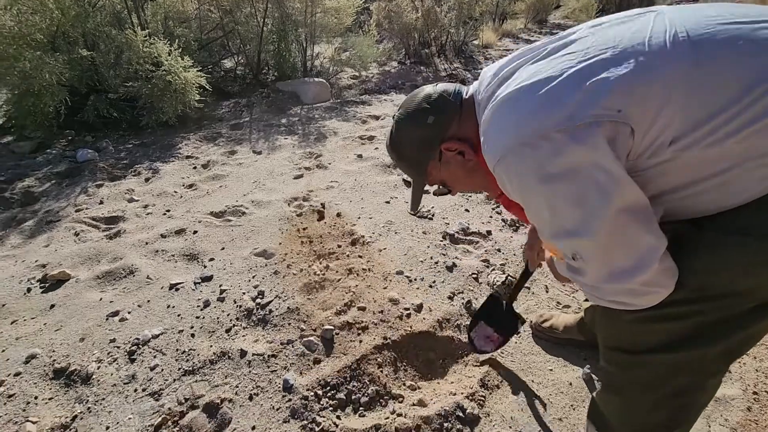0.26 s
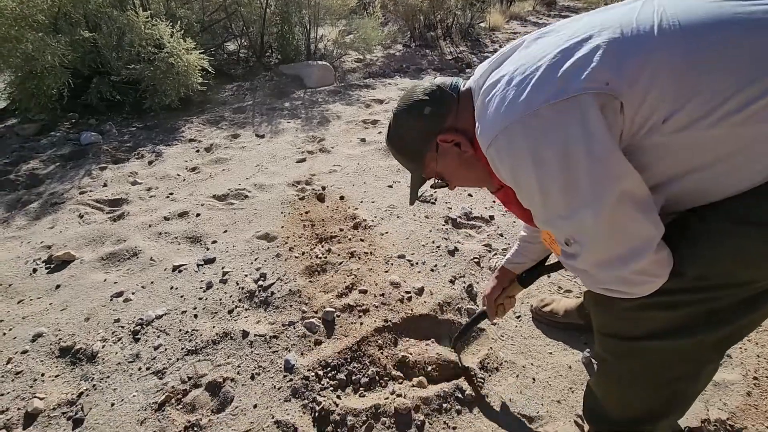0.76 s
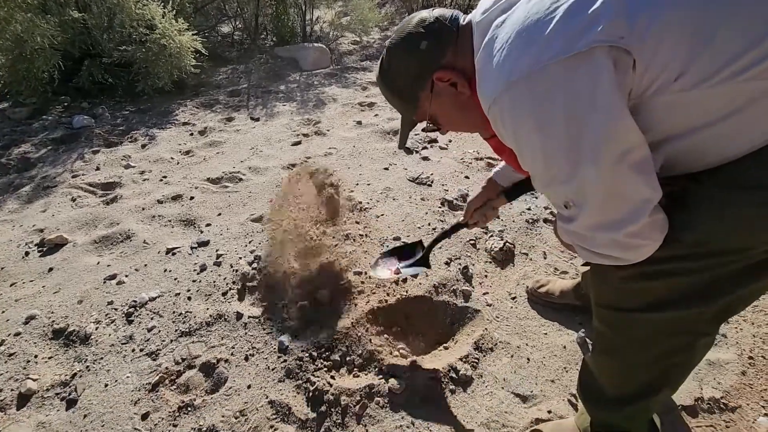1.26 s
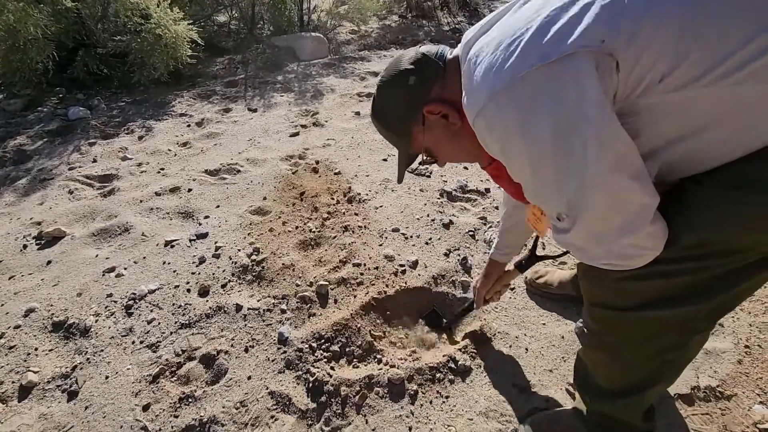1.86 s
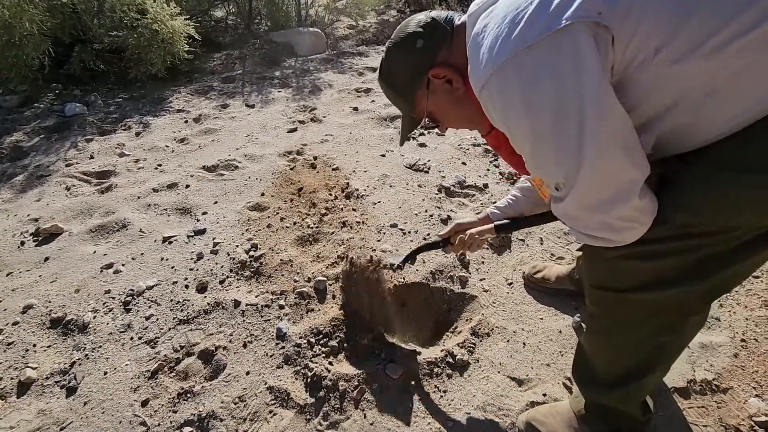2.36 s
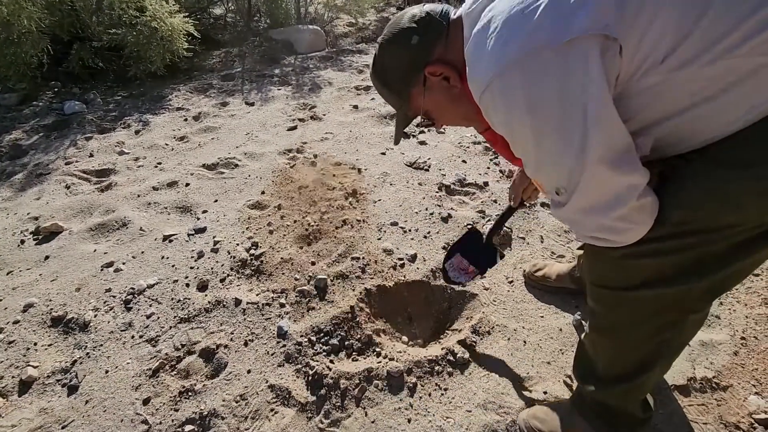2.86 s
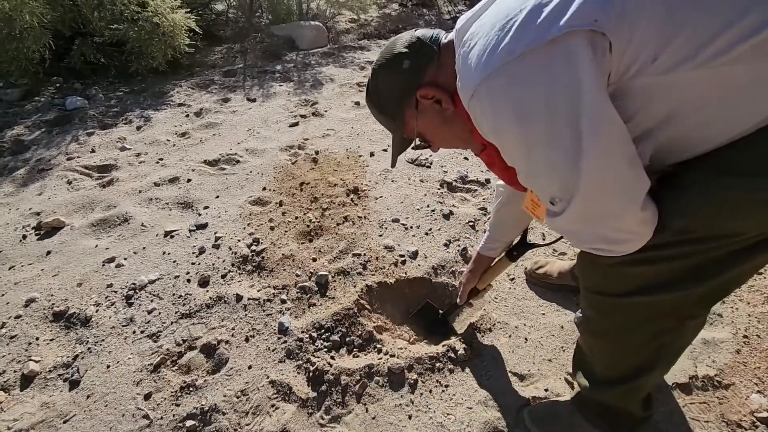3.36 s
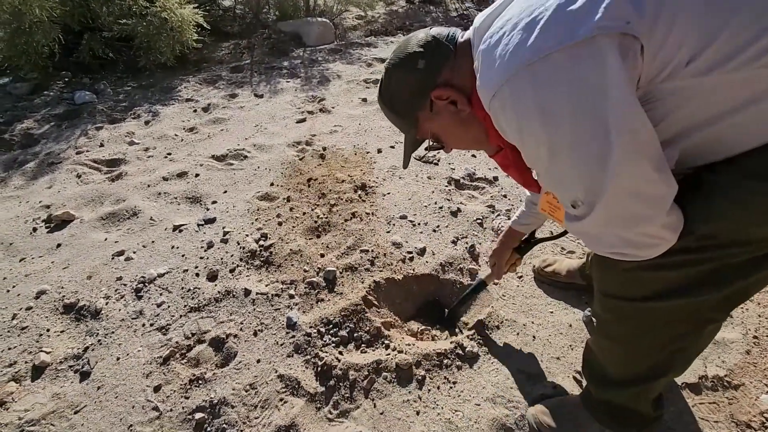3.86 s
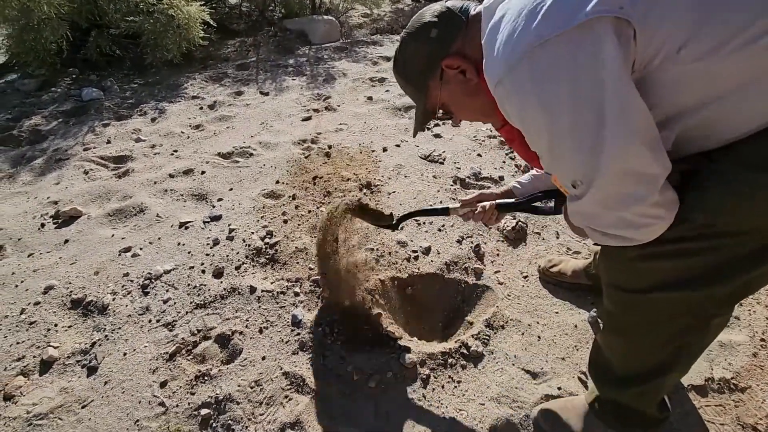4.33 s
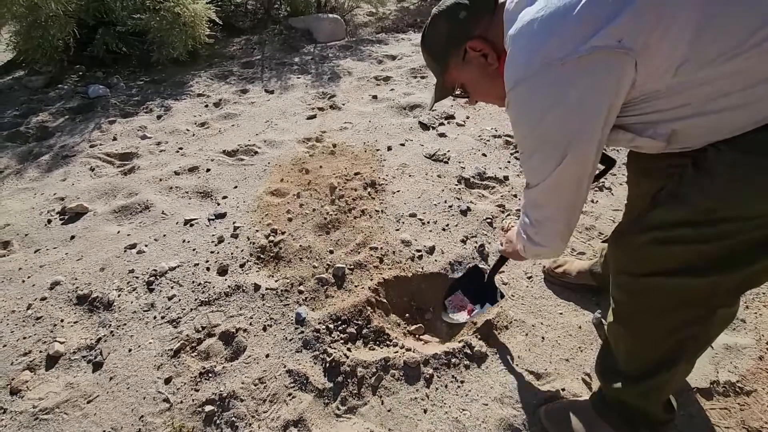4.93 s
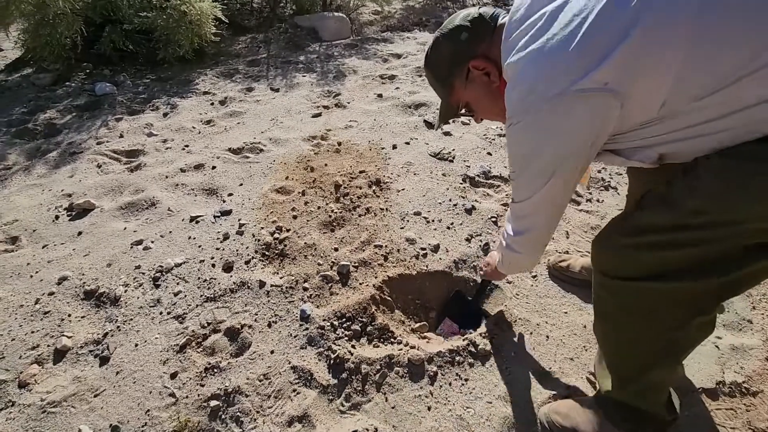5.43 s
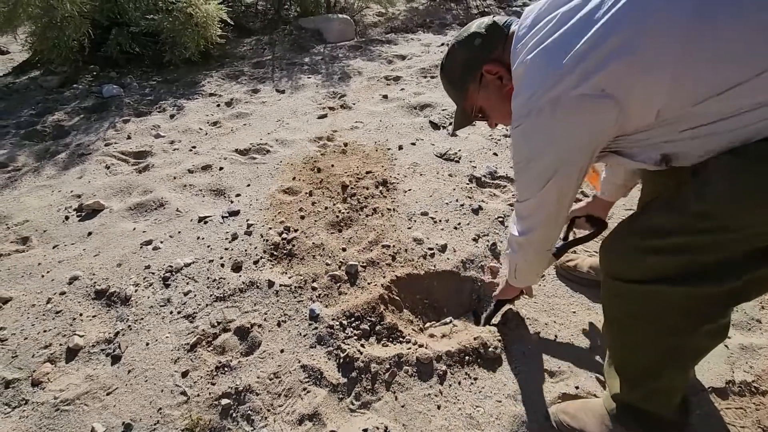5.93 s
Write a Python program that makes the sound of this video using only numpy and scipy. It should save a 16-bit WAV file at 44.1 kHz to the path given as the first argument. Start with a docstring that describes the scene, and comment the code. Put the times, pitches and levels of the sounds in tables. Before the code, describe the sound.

Close by in quiet open desert, a small steel shovel digs dry gravel. Three times it stabs in with a sharp gritty crunch and stone knocks, levers, and tosses dirt that slides off and patters on a heap to one side. The empty blade then clangs brightly, gets pushed in once more, drags through stones, and a boot shuffles. Faint airy hush beneath.

```python
"""A load of dry dirt patters down; then a short steel shovel digs gravelly soil in open desert, close by.
Three times it stabs in, levers a load loose and tosses it; dirt slides off the blade and patters to one side.
Then the empty blade is knocked and clangs, is pushed in once more and dragged, and a boot shuffles.
Grinding and pattering are random ticks and stone clicks; knocks are short bursts of noise;
the steel rings as a set of fading tones, and filtered noise gives the faint hush of the air."""
import sys
import numpy as np
from scipy import signal
from scipy.fft import rfft, irfft, next_fast_len
from scipy.io import wavfile
from scipy.ndimage import uniform_filter1d, map_coordinates

SR = 44100
rng = np.random.default_rng(int(sys.argv[2]) if len(sys.argv) > 2 else 0)


def bounce(signal):
    """Save signal as a 16-bit WAV file at the path given by the first command-line argument."""
    frames = np.transpose(np.atleast_2d(signal))
    limited = np.clip(frames, -1, 1)
    pcm = np.round(limited * 32767).astype(np.int16)
    wavfile.write(sys.argv[1], SR, pcm)


N = 272923  # length [samples]

# Event levels are those within a layer: scene() then sets the loudness of each whole layer.
# Thud (lows) and grit (treble) are set relative to the crunch between them.
# the blade is driven into the soil:
# (time [s], length [s], level [dB], thud [dB], grit [dB], growth on the way in [dB])
STAB_EVENTS = [(0.288, .12, -23, -10, 4, 2), (1.6585, .097, -22, -9, 6, -1),
               (3.047, .1, -27.5, -15, 7.5, 2.5), (5.192, 0.12, -32, -20, 3.5, 17)]
# the blade levers or drags through the soil:
# (loudest at [s], rise [s], fall [s], level [dB], thud [dB], grit [dB])
SCRAPE_EVENTS = [(0.48, .04, 0.033, -46, -4.5, -5), (1.8, .045, 0.06, -39, -10.5, -0.5),
                 (3.22, 0.073, 0.079, -43, -9.5, -1), (3.44, 0.083, 0.14, -48, -35, -1),
                 (3.6, 0.14, 0.062, -43.5, -13.5, -1), (3.69, 0.044, .06, -40.5, -4.5, 1.5),
                 (3.775, 0.072, 0.13, -40, -4.5, 2), (3.91, 0.02, .16, -37, -11, -15),
                 (4.135, 0.068, 0.069, -40, -15, 4), (5.35, 0.065, 0.12, -28, -13.5, -3),
                 (5.58, .25, 0.1575, -38.5, -3, -1.5), (5.755, 0.11, 0.081, -26, -6, -2)]
# loose dirt shifts on the blade or slides off it:
# (loudest at [s], rise [s], fall [s], level [dB], thud [dB], grit [dB])
SLIDE_EVENTS = [(0.19, 0.096, 0.088, -48.5, -10.5, -9), (0.6, 0.051, 0.0897, -50.5, -5, -5),
                (0.69, 0.07, .08, -46.5, -15, -9), (0.9, 0.13, 0.33, -51.5, -14, 0),
                (1.12, 0.058, .24, -44, -11.5, 4.5), (2.03, 0.077, 0.08, -40.5, -23, -5),
                (2.16, 0.05, 0.047, -40, -14.5, -3), (2.27, 0.054, 0.078, -46.5, -30, -6.5),
                (2.485, .075, .16, -46.5, -19, 2.5), (4.27, 0.1, 0.15, -52, -12, 4),
                (4.52, 0.21, 0.066, -48, -8.5, 7.5), (4.87, 0.096, 0.06, -57.5, -17, 2.5),
                (4.965, .03, 0.063, -55.5, -17, 0)]
# a tossed load lands on the heap:
# (time [s], length [s], level [dB], thud [dB], grit [dB], growth while it lands [dB])
SHOWER_EVENTS = [(0.0, 0.027, -38.5, -6.5, 9, -7.5), (1.342, 0.042, -41, -2.5, 9.5, -12),
                 (2.684, .06, -50.5, -4.5, 12, 6), (4.552, 0.12, -47.5, -6.5, 13.5, -1.5)]
# a boot shifts in loose soil: (loudest at [s], rise [s], fall [s], level [dB], thud [dB], grit [dB])
SCUFF_EVENTS = [(5.16, 0.049, 0.0567, -38.5, -4, -13.5), (5.87, 0.041, 0.086, -44, -15, -4.5),
                (5.96, 0.041, 0.053, -41.5, -13.5, -14), (6.028, 0.013, 0.04, -39, -21, -7.5),
                (6.07, 0.021, 0.024, -41.5, -16, -9), (6.13, .03, 0.042, -51.5, -23, 2),
                (6.18, 0.028, 0.037, -38.5, 4, -2)]
# sharp stones rasp along the steel: (loudest at [s], rise [s], fall [s], level [dB], thud [dB], grit [dB])
RASP_EVENTS = [(1.106, .01, 0.014, -38, -40, 1.5), (3.912, .018, 0.033, -30.5, -25, -12),
               (3.98, .04, .1, -42, -29, -4.5)]
# the blade meets or cracks a stone: (time [s], level [dB], thud [dB], grit [dB], time to fade by 60 dB [s])
KNOCK_EVENTS = [(0.2882, -9.5, -25, -1, 0.0086), (0.3639, -17.5, -10, -17, 0.045),
                (0.7844, -36.5, -24, -5, 0.002), (0.8267, -38.5, -20, -2, 0.012),
                (0.8624, -21, -22, -3, 0.011), (1.6597, -15.5, -17, 0.5, 0.028),
                (1.7349, -20.5, -0.5, 10.5, 0.054), (1.8058, -29, -20, -4.5, 0.02),
                (3.0475, -24, -12, 17, 0.015), (3.0605, -18.5, -10, 11, 0.04),
                (3.1379, -18.5, -2, 6, 0.043), (3.856, -29.5, -13, 3, 0.013),
                (3.8618, -24.5, -2.5, 1.5, 0.063), (3.8956, -22.5, -10.5, 2.5, 0.019),
                (4.052, -44.5, -23, 17.5, 0.0078), (4.1766, -20, -18.5, -5, 0.014),
                (5.2951, -8.5, -15, -1.5, 0.017), (5.7472, -14.5, -10, -17, 0.028),
                (5.7799, -24, -11, -19, 0.021), (5.8209, -28, 4, -2, 0.032)]
# larger pebbles land or click together: (time [s], level [dB], thud [dB], grit [dB], time to fade by 60 dB [s])
PEBBLE_EVENTS = [(0.0154, -46, 0, 25.5, 0.0024), (0.9457, -44.5, -28, 13, 0.0099),
                 (1.0333, -34.5, -15, 13, 0.0023), (1.0885, -31.5, -24, 10.5, 0.0078),
                 (1.1782, -29.5, -4, 10.5, .0025), (1.236, -25.5, -11, 1, 0.012),
                 (1.2654, -34, -11, 5, 0.0082), (1.3008, -32.5, -10, 19.5, .005),
                 (1.3297, -38.5, -17, 9, 0.0045), (1.3596, -40, -6, 1, 0.009), (1.3653, -45, -14, 17, .01),
                 (1.3759, -44.5, 2, 22.5, 0.0031), (1.6034, -45.5, 1, -9, 0.013),
                 (1.9171, -47, -16, 14.5, 0.0024), (2.261, -34.5, -18, 0, .01),
                 (2.3669, -40, -32, 2.5, 0.023), (2.5269, -50, -21, 25.5, 0.0088),
                 (2.5678, -33, -17, 6, 0.02), (2.6056, -49.5, -8, 27, 0.011),
                 (2.6771, -42, 1, 13.5, 0.0082), (2.7074, -47, -20, 21, .012),
                 (2.735, -33.5, -13, 10, 0.0065), (2.8545, -60, -14, 25, 0.016),
                 (3.3516, -48.5, -28, 12, 0.0041), (4.4985, -41, -16, 15, 0.0069),
                 (4.5612, -43, -22, 24.5, 0.029), (4.6258, -39.5, -5, 17, .008),
                 (4.9286, -52, -11, 13.5, 0.0069), (5.1425, -48, -7, -21, 0.013),
                 (5.958, -41.5, -7, -4, 0.0073), (6.0225, -46, -20, 3, .008),
                 (6.061, -51, -12, -10, 0.0096)]
# blows on the free blade: (time [s], level [dB])
CLANG_EVENTS = [(4.684, -10), (4.689, -20.5), (4.7101, -27.5), (4.7823, -42), (4.96, -59)]
# packed ground takes a push of blade or boot: (time [s], level [dB], pitch [Hz], time to fade by 60 dB [s])
THUD_EVENTS = [(0.362, -48, 90, 0.093), (1.734, -41, 73, 0.067), (3.137, -39, 105, 0.086),
               (5.82, -32.5, 86, 0.078), (6.164, -36.5, 106, .16)]

# tone colour of each kind of sound, applied before crunch, thud and grit get their levels
# grains around a stabbing blade: (frequency [Hz], gain [dB])
STAB_TONE = [(40, -11), (85, -3.5), (160, 0.5), (320, -0.5), (480, -6.5), (750, -5.5), (1300, -2.5),
             (2000, -3.5), (3000, -6), (4200, -8), (6000, -2.5), (10000, -5), (15500, -2.5)]
# grains around a scraping blade: (frequency [Hz], gain [dB])
SCRAPE_TONE = [(40, -27), (100, -15.5), (300, -2), (600, -3.5), (1300, 4), (2700, -3.5), (4000, -8.5),
               (6500, -9), (10000, -12.5), (15500, -13.5)]
# grains under a boot: (frequency [Hz], gain [dB])
SCUFF_TONE = [(40, -22), (200, 2.5), (450, -3), (700, 4.5), (1150, 4), (1800, -6.5), (3000, -20),
              (6000, -25.5), (9000, -34), (15500, -44)]
# sliding dirt and rasping stones: (frequency [Hz], gain [dB])
SLIDE_TONE = [(40, 1), (300, -18), (700, -9.5), (1300, -5.5), (2300, -2.5), (3800, -5.5), (6000, 4.5),
              (10000, 3.5), (15500, 2.5)]
# a landing load: (frequency [Hz], gain [dB])
SHOWER_TONE = [(40, -1), (110, 12.5), (300, -8.5), (600, 0.5), (1500, 9.5), (4000, -4), (8000, -6),
               (15500, -4.5)]
# a knock on the blade: (frequency [Hz], gain [dB])
KNOCK_TONE = [(40, -21), (180, -9.5), (350, -7.5), (550, -12.5), (900, 1), (1300, 6), (2000, 4),
              (2800, -3.5), (6000, -1.5), (15500, -10)]
# the click of a pebble: (frequency [Hz], gain [dB])
PEBBLE_TONE = [(40, -24), (200, -13), (700, -4), (2000, -5), (6000, 6), (15500, 10.5)]

# ringing tones of the blade, loud or soft relative to each other:
# (frequency [Hz], strength in air [dB], time to fade by 60 dB in air [s], strength in soil [dB])
BLADE_MODES = [(273, -34, .1, 0), (362, -23.5, 0.21, 1), (1535, -10, 0.23, -37), (1672, -11, .1, 5),
               (1788, -32, .1, 0.5), (2269, 1.5, 0.16, -9.5), (2333, -9, 0.39, -3.5),
               (2510, 1, 0.21, -33.5), (2480, 0.5, 0.15, -10.5), (3400, -8.5, 0.23, -14),
               (3823, -16, 0.12, 3.5), (4100, -8, .11, -34), (4730, 14.5, 0.046, -3), (4920, 3, 0.15, -14),
               (5170, -6, 0.21, 3), (5520, 3, 0.046, 0), (6510, -1.5, 0.11, 1.5), (7276, 5.5, 0.053, 4),
               (7870, -1, 0.098, 4.5), (8800, 1.5, 0.069, -31), (9800, 8, 0.066, 5.5),
               (10440, -3, 0.024, -2.5), (12050, -2, 0.078, -4), (13600, -16, .1, 1), (14300, -16, .11, -6),
               (15100, -14, .09, -23)]
# outline of the still desert air, relative: (frequency [Hz], density [dB per Hz])
AIR_TONE = [(20, 0), (45, 13), (100, -1), (250, 2), (500, -3.5), (900, -1), (2000, -8), (4000, -7.5),
            (8000, -8), (15500, -12.5)]
# colour of the two microphone ports: (frequency [Hz], left over right [dB])
PORT_TONE = [(300, 0), (700, 2.5), (1400, 1.4), (2800, -.3), (5500, -.5), (9000, -1.9), (14000, -.4)]
# bearing of the blade: (time [s], delay of the left port [ms])
BLADE_BEARING = [(0.29, 0.11), (1.7, 0.067), (3.9, 0.053), (5.3, 0.083)]

AIR_DB = -55.5
THUD_HZ, GRIT_HZ = 600, 4000  # thud lies below the first, grit above the second
EDGE_HZ = 15900  # upper limit of the recorder
# small pebbles that fly with each load
STRAY_DB, STRAY_SPREAD_DB, STRAY_THUD_DB, STRAY_GRIT_DB = -53.5, 0, -14, 18.5
STRAY_EARLY_S, STRAY_LATE_S = 0.22, 0.035  # how far before and after the start of a landing
HOLE_LAG_MS, HEAP_LAG_MS, TOSS_S = 0.051, -0.091, 0.49  # a load swings between hole and heap
RING_APART_HZ = 5060  # from here up, ringing tones reach the two ports with unrelated phase


def stabs():
    """The driven blade starts a sudden crunch of grains, which also set the buried steel ringing."""
    return plunges(STAB_EVENTS, attack_s=0.0017, release_t60=.085, deepen_db=5, dull_db=10,
                   colour=STAB_TONE, lag=blade_lag, per_s=3200, spread_db=3.5, grain_t60=0.0035,
                   ring_db=-6.0, patchy_db=3.0, stone_db=-6.5, scatter_db=-0.5)


def scrapes():
    """The levering or dragging blade grinds grains, swelling and easing off with its movement."""
    return strokes(SCRAPE_EVENTS, ebb_db=17, roundness=1.87, colour=SCRAPE_TONE, lag=blade_lag,
                   per_s=1800, spread_db=2.5, grain_t60=0.002,
                   ring_db=-10, patchy_db=2.0, stone_db=-3.5, scatter_db=0)


def knocks():
    """A stone struck by the blade gives a sharp snap, a short crack and some ring."""
    return hits(KNOCK_EVENTS, KNOCK_TONE, blade_lag, snap_db=6, ring_db=-10.0,
                tail_db=-24.0, tail_t60=0.027, scatter_db=-2.0, scatter_t60=0.014)


def clangs(clatter_db=0.5, low_t60=0.17, high_t60=0.1, high_db=4.0, lowest_hz=1650, split_hz=5300):
    """The empty blade rings freely amid a clatter of its many weaker modes, whose treble dies first."""
    out = np.zeros((2, N))
    attack = round(.01 * SR)
    for s, db in CLANG_EVENTS:
        ring = blade_ring(False)
        t = np.arange(ring.shape[1]) / SR
        dense = rng.standard_normal(ring.shape)
        low = evened(band(dense, [lowest_hz, split_hz], "bandpass", order=6)) * amp(-60 * t / low_t60)
        high = evened(band(dense, split_hz, "highpass")) * amp(high_db - 60 * t / high_t60)
        sound = evened(ring) + amp(clatter_db) * evened(low + high)
        # the level holds over the attack
        add(out, s, amp(db) * sound / sound[:, :attack].std())
    return out


def rasps():
    """Sharp stones drawn along the steel make brief streams of ticks that ring it."""
    return strokes(RASP_EVENTS, ebb_db=12, roundness=4.1, colour=SLIDE_TONE, lag=blade_lag,
                   per_s=1000, spread_db=4.5, grain_t60=0.0017,
                   ring_db=-7.5, patchy_db=1.5, stone_db=-5.5, scatter_db=-3)


def slides():
    """Loose dirt running over the blade is a dense stream of small ticks that swells and fades."""
    return strokes(SLIDE_EVENTS, ebb_db=13.5, roundness=2.06, colour=SLIDE_TONE, lag=load_lag,
                   per_s=2500, spread_db=4.5, grain_t60=0.002,
                   ring_db=-10, patchy_db=2.2, stone_db=-4, scatter_db=1.0)


def showers():
    """A tossed load hits the heap as a burst of grains, then patters out."""
    return plunges(SHOWER_EVENTS, attack_s=.012, release_t60=0.44, deepen_db=5.5, dull_db=5,
                   colour=SHOWER_TONE, lag=load_lag, per_s=1300, spread_db=2.0, grain_t60=0.0046,
                   ring_db=-21, patchy_db=3.0, stone_db=-7, scatter_db=1.5)


def pebbles():
    """Larger pebbles, and strays from each load, click as single short cracks."""
    return hits(PEBBLE_EVENTS + strays(), PEBBLE_TONE, load_lag, snap_db=5.5, ring_db=-15,
                tail_db=-25.0, tail_t60=0.043, scatter_db=2.5, scatter_t60=0.0043)


def strays(t60=0.0088, count=4):
    """A few small pebbles come down at random around each landing."""
    rows = []
    for landing in SHOWER_EVENTS:
        for _ in range(count):
            s = abs(landing[0] + rng.uniform(-STRAY_EARLY_S, STRAY_LATE_S))
            db = rng.normal(STRAY_DB, STRAY_SPREAD_DB)
            rows.append((s, db, STRAY_THUD_DB, STRAY_GRIT_DB, t60))
    return rows


def scuffs():
    """A boot presses and rubs loose soil, in sparse ticks of very unequal size."""
    return strokes(SCUFF_EVENTS, ebb_db=14, roundness=2.34, colour=SCUFF_TONE, lag=blade_lag,
                   per_s=880, spread_db=5.0, grain_t60=0.0046,
                   ring_db=-14, patchy_db=3.5, stone_db=-3.5, scatter_db=2.5)


def thuds(rise_s=0.0086, size=9000):
    """The ground gives a few dull, low swings that reach both ports alike."""
    out = np.zeros((2, N))
    t = np.arange(size) / SR
    for s, db, hz, t60 in THUD_EVENTS:
        level = amp(db - 60 * t / t60) * (1 - np.exp(-t / rise_s))
        swing = level * np.sin(2 * np.pi * hz * t)
        add(out, s, np.array([swing, swing]))
    return out


def air(apart_hz=1200):
    """A faint hush: its rumble is mostly shared by both ports, its hiss much less so."""
    shared, apart = rng.standard_normal((2, N))
    side = .25 * apart + .7 * band(apart, apart_hz, "highpass", order=1)
    return amp(AIR_DB) * evened(coloured(np.array([shared + side, shared - side]), AIR_TONE))


def plunges(rows, attack_s, release_t60, deepen_db, dull_db, **grain):
    """Steel or a load runs into the ground: a sudden start, more thud and less grit, then it settles."""
    out = np.zeros((2, N))
    for s, length, db, thud_db, grit_db, growth_db in rows:
        t = np.arange(0, length + release_t60, 1 / SR)
        depth = np.minimum(t / length, 1) - .5  # -0.5 at the surface, 0.5 fully in
        settling_db = -60 * np.maximum(t - length, 0) / release_t60
        level = np.minimum(t / attack_s, 1) * amp(db + growth_db * depth + settling_db)
        sound = gravel(s + t, thud_db + deepen_db * depth, grit_db - dull_db * depth, **grain)
        add(out, s, level * sound)
    return out


def strokes(rows, ebb_db, roundness, **grain):
    """A movement gathers speed and eases off: ebb_db quieter one rise before and one fall after its peak."""
    out = np.zeros((2, N))
    reach = 1.7  # how many rises and falls are heard
    for s, rise, fall, db, thud_db, grit_db in rows:
        t = np.arange(max(s - reach * rise, 0), s + reach * fall, 1 / SR)
        away = np.maximum((s - t) / rise, (t - s) / fall)
        level = amp(db - ebb_db * away ** roundness)
        add(out, t[0], level * gravel(t, thud_db, grit_db, **grain))
    return out


def hits(rows, colour, lag, snap_db, ring_db, tail_db, tail_t60, scatter_db, scatter_t60, size=4096):
    """Each is one sharp snap in a short crack, a faint trickle of crumbs and some ring of the blade."""
    out = np.zeros((2, N))
    t = np.arange(size) / SR
    contact, attack = round(.0004 * SR), round(.006 * SR)
    for s, db, thud_db, grit_db, t60 in rows:
        fade = amp(-60 * t / t60) + amp(tail_db - 60 * t / tail_t60)
        crack = rng.standard_normal(size) * fade
        crack[contact] += amp(snap_db)
        crack = ports(crack, lag(s), scatter_db, scatter_t60)
        parts = registers(coloured(on_steel(crack, ring_db), colour))
        # the level is the whole energy spread over the attack
        parts = [part / np.sqrt(np.sum(part ** 2) / 2 / attack) for part in parts]
        add(out, s, sum(part * amp(db + rel) for part, rel in zip(parts, (0, thud_db, grit_db))))
    return out


def gravel(t, thud_db, grit_db, colour, lag, per_s, spread_db, grain_t60, ring_db, patchy_db, stone_db,
           scatter_db):
    """Gravel grinds or patters evenly over the times t, and the grains that touch the steel ring it."""
    ticks = ports(grains(len(t), per_s, spread_db, grain_t60, stone_db), lag(t), scatter_db)
    parts = registers(coloured(shifting(on_steel(ticks, ring_db), patchy_db), colour))
    return sum(part / part.mean(0).std() * amp(db) for part, db in zip(parts, (0, thud_db, grit_db)))


def grains(n, per_s, spread_db, grain_t60, stone_db, stones_per_s=350, cycles=6.1, size=400):
    """Sand cracks in random ticks, most tiny, a few large; small stones click, each at its own pitch."""
    happens = rng.random(n) < per_s / SR
    sizes = amp(spread_db * np.minimum(rng.exponential(1, n), 3.5)) * happens
    sand = rng.standard_normal(n) * np.sqrt(dying(sizes ** 2, grain_t60))
    at = np.flatnonzero(rng.random(n) < stones_per_s / SR)
    pitch, weight = rng.random((len(at), 2)).T[:, :, None]
    hz = 600 * 24 ** pitch
    turns = hz * np.arange(size) / SR
    clicks = hz * weight ** 2 * np.sin(2 * np.pi * turns) * np.exp(-turns / cycles)
    # add up all clicks, each from its own starting sample
    places = (at[:, None] + np.arange(size)).ravel()
    stones = np.bincount(places, clicks.ravel(), n)[:n]
    return evened(sand) + amp(stone_db) * evened(stones)


def shifting(x, patchy_db, patch_s=0.051, patch_hz=450, size=512):
    """As stones of other sizes come under the blade, the colour drifts in random patches."""
    overlap = size * 3 // 4
    z = signal.stft(x, nperseg=size, noverlap=overlap)[2]
    hz_span = max(round(patch_hz * size / SR), 1)
    time_span = max(round(patch_s * SR * 4 / size), 1)
    patches = rng.standard_normal(z.shape[1:])
    for _ in range(2):
        patches = uniform_filter1d(patches, hz_span, axis=0, mode="wrap")
        patches = uniform_filter1d(patches, time_span, axis=1, mode="wrap")
    z = z * amp(patchy_db * evened(patches - patches.mean(0)))
    return signal.istft(z, nperseg=size, noverlap=overlap)[1][:, :x.shape[1]]


def blade_ring(buried, soil_t60=0.031):
    """The ring of the blade at both ports; soil packed against it damps it and favours other modes."""
    t = np.arange(1400 if buried else 18000) / SR
    ring = 0
    for hz, air_db, t60, soil_db in BLADE_MODES:
        # the higher the tone, the more its phase differs between the ports
        turns = rng.random() + min(hz / RING_APART_HZ, 1) ** 2 * rng.random((2, 1))
        fade = amp(soil_db - 60 * t / soil_t60) if buried else amp(air_db - 60 * t / t60)
        ring = ring + fade * np.sin(2 * np.pi * (hz * t + turns))
    return ring / np.linalg.norm(ring, axis=1, keepdims=True)


def on_steel(x, ring_db):
    """Adds the ring of the buried blade, which radiates differently toward each port."""
    ring = blade_ring(True)
    return x + amp(ring_db) * signal.fftconvolve(x, ring, axes=1)[:, :x.shape[1]]


def ports(x, lag_ms, scatter_db, scatter_t60=0.059, scatter_hz=1700):
    """Sound reaches the left port lag_ms after the right; stony ground scatters treble to each on its own."""
    left = map_coordinates(x, [np.arange(len(x)) - lag_ms * SR / 1000], order=3)
    direct = np.array([left, x])
    ground = rng.standard_normal((2, len(x))) * np.sqrt(dying(x ** 2, scatter_t60))
    return direct + amp(scatter_db) * band(ground, scatter_hz, "highpass", order=3)


def blade_lag(s):
    """The bearing of the blade at time s, as the delay of the left port in ms."""
    return np.interp(s, *np.transpose(BLADE_BEARING))


def load_lag(s):
    """Loose dirt is over the heap when a load lands, and over the hole between tosses; in ms."""
    apart_s = np.min([abs(s - row[0]) for row in SHOWER_EVENTS], axis=0)
    return np.interp(apart_s, [0, TOSS_S], [HEAP_LAG_MS, HOLE_LAG_MS])


def registers(x):
    """Splits a sound into crunch, thud and grit."""
    crunch = band(x, [THUD_HZ, GRIT_HZ], "bandpass")
    return crunch, band(x, THUD_HZ, "lowpass"), band(x, GRIT_HZ, "highpass")


def dying(power, t60):
    """Lets each burst of power die away, by 60 dB in t60 seconds."""
    keep = amp(-60 / SR / t60) ** 2
    return signal.lfilter([1 - keep], [1, -keep], power)


def coloured(x, spectrum):
    """Filters by an outline of (frequency [Hz], gain [dB])."""
    hz, db = np.transpose(spectrum)
    size = next_fast_len(x.shape[-1] + 1024)
    f = np.fft.rfftfreq(size, 1 / SR)
    gain = amp(np.interp(np.log(f + 1), np.log(hz), db))
    return irfft(rfft(x, size) * gain, size)[..., :x.shape[-1]]


def band(x, hz, kind, order=4):
    """Keeps only part of the frequency range."""
    return signal.sosfilt(signal.butter(order, hz, kind, fs=SR, output="sos"), x)


def amp(db):
    """Turns dB into a plain factor."""
    return 10 ** (np.asarray(db) / 20)


def evened(x):
    """Brings a sound to an average (RMS) level of one."""
    return x / np.sqrt(np.mean(x ** 2) + 1e-20)


def add(mix, s, sound):
    """Mixes a stereo sound in at time s."""
    part = mix[:, max(round(s * SR), 0):][:, :sound.shape[1]]
    part += sound[:, :part.shape[1]]


def scene():
    """The hole lies a little to one side of the microphone, the spoil heap to the other."""
    digging = amp(-1.0) * stabs() + amp(-0.93) * scrapes()
    steel = amp(-0.9) * knocks() + clangs() + amp(1.6) * rasps()
    dirt = amp(-1.43) * slides() + amp(-2.5) * showers() + amp(-4.5) * pebbles()
    ground = amp(-1.1) * scuffs() + amp(9.5) * thuds()
    return digging + steel + dirt + ground + air()


def record(dry):
    """Each port has its own colour; the hardest blows overload the recorder; then its band limit."""
    hz, lean_db = np.transpose(PORT_TONE)
    # each port takes half of the difference
    heard = np.array([coloured(x, np.c_[hz, side * lean_db / 2]) for x, side in zip(dry, (1, -1))])
    clipped = np.clip(heard, -1, 1)
    lowpass = signal.firwin(255, EDGE_HZ, window=("kaiser", 7), fs=SR)
    return signal.oaconvolve(clipped, lowpass[None], "same")


dry = scene()
out = record(dry)
bounce(out)
```